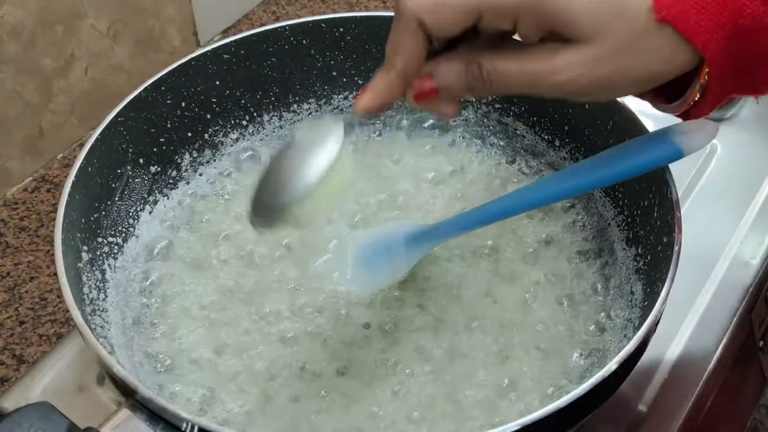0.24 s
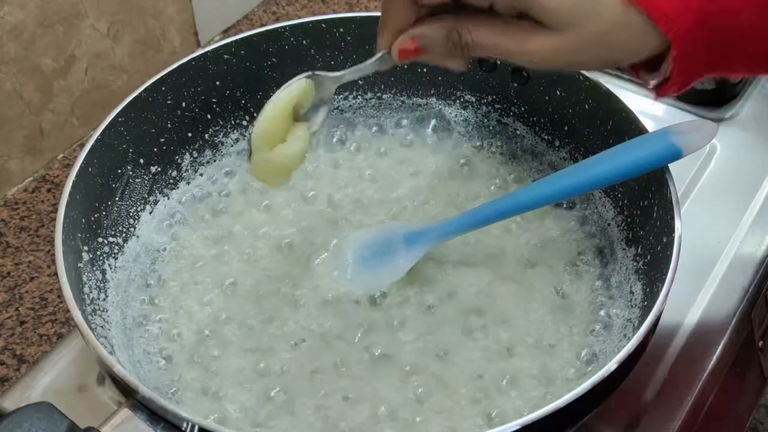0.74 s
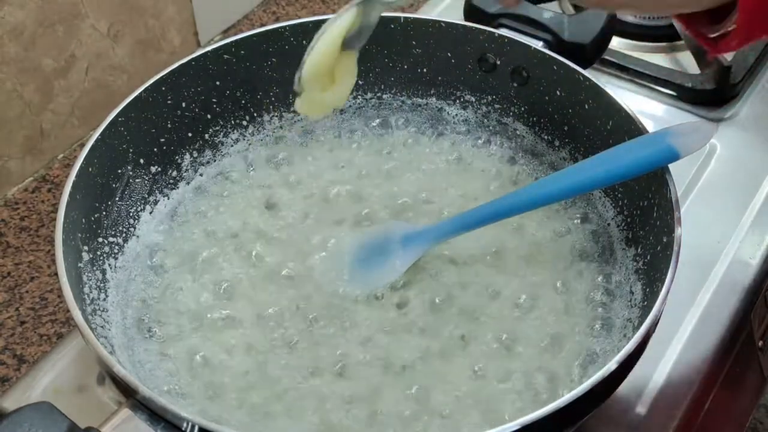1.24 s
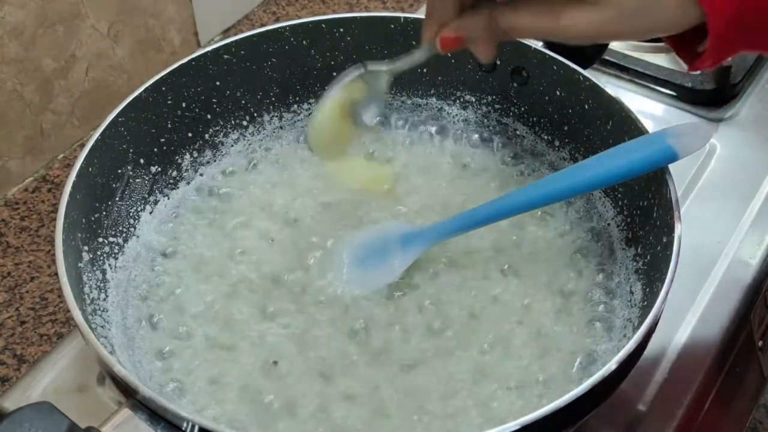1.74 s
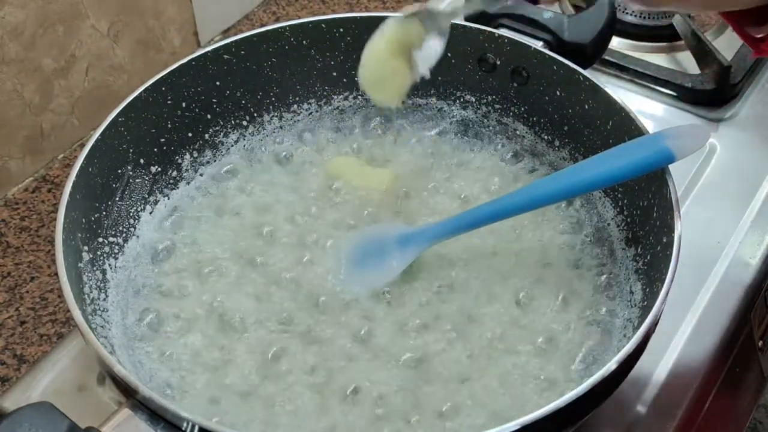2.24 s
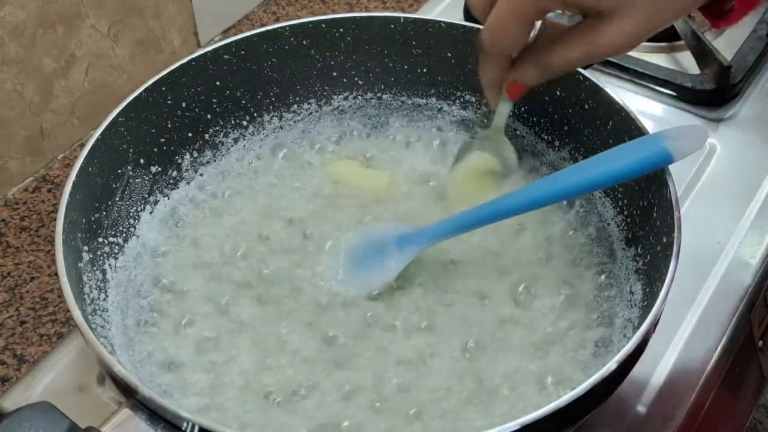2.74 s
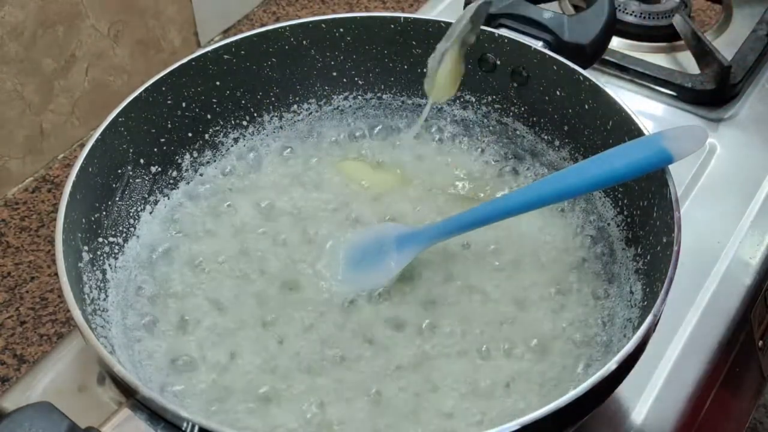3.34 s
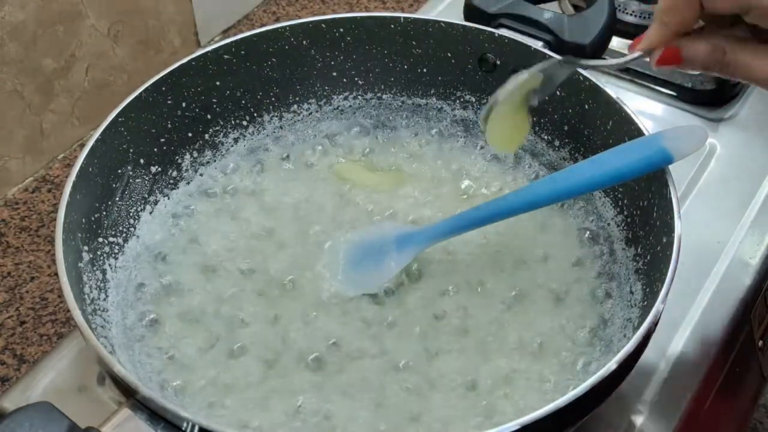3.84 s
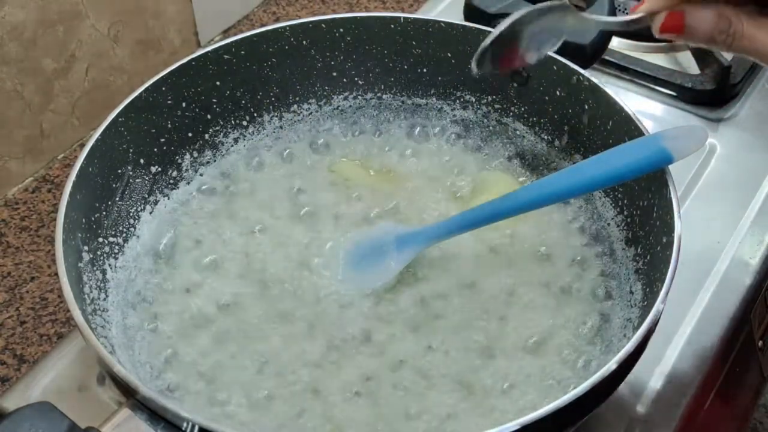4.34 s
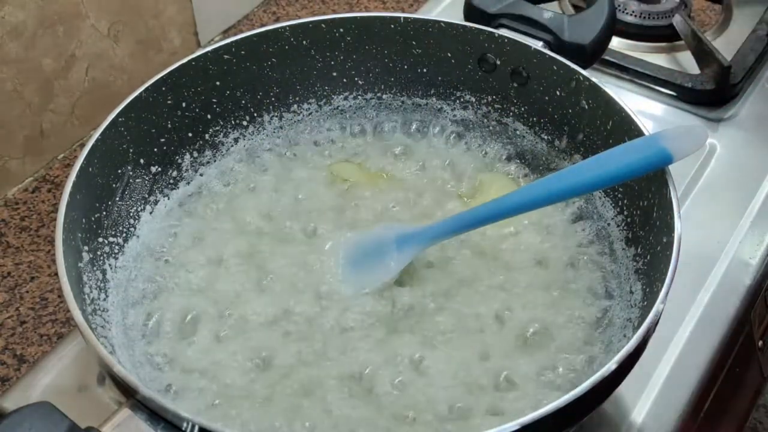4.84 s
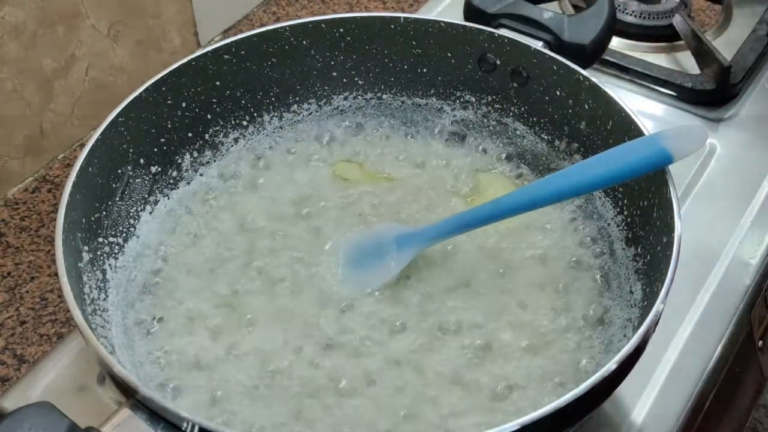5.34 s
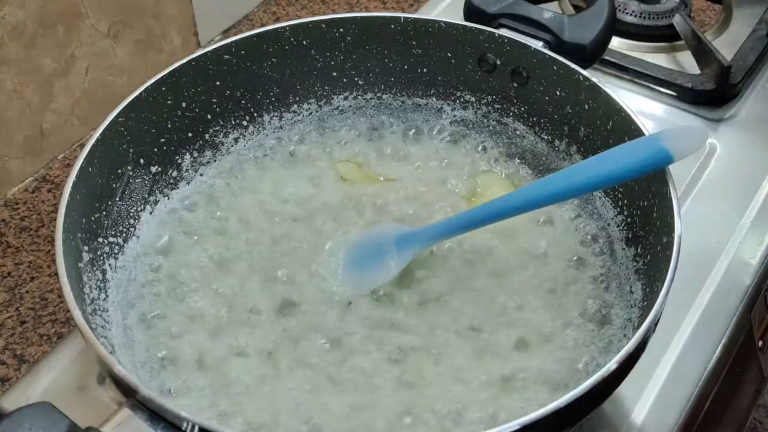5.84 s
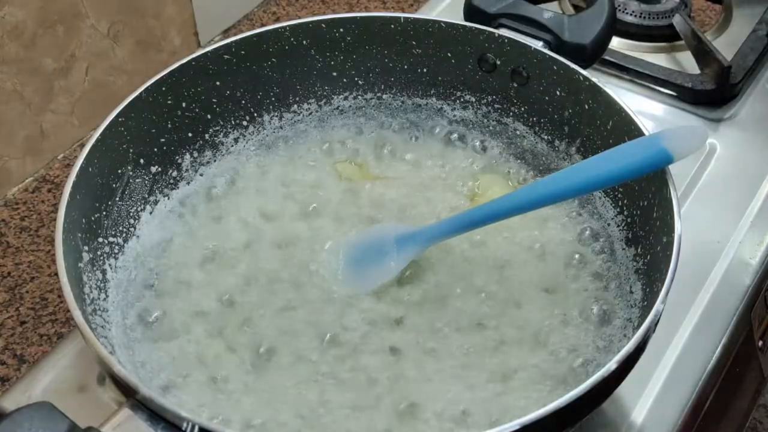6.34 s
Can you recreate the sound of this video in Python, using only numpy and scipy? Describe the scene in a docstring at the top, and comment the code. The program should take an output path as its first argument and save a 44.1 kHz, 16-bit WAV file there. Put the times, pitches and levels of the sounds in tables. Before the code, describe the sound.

Thick syrup bubbles in a wide pan with quick bright pops over soft burner hiss, a spoon knocks, an engine hums outside, dishes clatter late.

```python
"""In a hard kitchen, thick sugar syrup simmers in a wide pan: small skins burst as short ringing ticks.
The burner hisses as patchy coloured noise, and a spoon knocks and rubs the pan, ringing its modes.
Off to the left, steel dishes are dragged as slipping noise and set down as blows on crowds of partials.
Outside an engine gains speed, drops back and idles; its orders swell as they cross the room's bass modes."""
import sys
import numpy as np
from scipy import signal
from scipy.fft import next_fast_len
from scipy.io import wavfile
from scipy.ndimage import uniform_filter1d

SR = 44100
rng = np.random.default_rng(int(sys.argv[2]) if len(sys.argv) > 2 else 0)


def wav_record(signal):
    """Record a signal, one row per channel, as 16-bit PCM in the file named by sys.argv[1]."""
    frames = np.transpose(np.atleast_2d(signal))
    bounded = np.clip(frames, -1, 1)
    # unit amplitude maps onto the largest positive 16-bit level
    quanta = np.round(bounded * 32767).astype(np.int16)
    wavfile.write(sys.argv[1], SR, quanta)


N = 290612  # length in samples


def gain_of(db):
    """Turns decibels into amplitude."""
    return 10 ** (np.asarray(db) / 20)


def evened(x):
    """Scales a signal to rms 1."""
    return x / np.sqrt(np.mean(x ** 2) + 1e-20)


def read(points, hz):
    """Reads a curve over frequency, straight between its points on a log-frequency axis."""
    f, value = np.transpose(points)
    return np.interp(np.log(hz + 1), np.log(f + 1), value)


def add(mix, s, sound):
    """Adds a sound into the mix at time s in seconds, cut where the mix ends."""
    part = mix[..., max(round(s * SR), 0):][..., :sound.shape[-1]]
    part += sound[..., :part.shape[-1]]


def follow(rows):
    """Returns the start time and every further column drawn out sample by sample."""
    s, *columns = np.transpose(rows)
    t = np.arange(s[0], s[-1], 1 / SR)
    return s[0], [np.interp(t, s, c) for c in columns]


# How alike left and right are. Each row: frequency in Hz, likeness from 0 to 1.
EAR_LIKENESS = [(100, 0.76), (250, 0.86), (600, 0.61), (1500, 0.066), (10000, 0.018)]


def blend_ears(left, other, hz):
    """Mixes a second spectrum with the left one so the ears agree in the bass and part in the treble."""
    same = np.clip(read(EAR_LIKENESS, hz), -1, 1)[:, None]
    return np.array([left, same * left + np.sqrt(1 - same ** 2) * other])


def noise(spectrum, patchy_db, size=512):
    """Two partly alike channels of coloured noise whose level drifts in patches of time and frequency; rms 1."""
    frames = N * 4 // size + 5
    hz = np.fft.rfftfreq(size, 1 / SR)
    a, b, c, d, patches = rng.standard_normal((frames, len(hz), 5)).T
    patches = uniform_filter1d(patches, size=6, axis=0)
    patches = evened(uniform_filter1d(patches, size=20, axis=1))
    grains = blend_ears(a + 1j * b, c + 1j * d, hz)
    grains = grains * gain_of(read(spectrum, hz)[:, None] + patchy_db * patches)
    return evened(signal.istft(grains, nperseg=size, noverlap=size * 3 // 4)[1][:, :N])


def struck(modes, crowd):
    """One blow on thin metal: each mode is nine close partials, shares set by where it lands; peak 1."""
    t = np.arange(SR // 5) / SR
    hz, db, t60 = np.repeat(np.transpose(modes), 9, axis=1)[:, :, None]
    share, detune, phase = rng.standard_normal((3, len(hz), 1))
    level = gain_of(db + 3 * share - 60 * t / t60)  # shares spread by 3 dB
    partials = level * np.sin(2 * np.pi * hz * (1 + crowd * detune) * t + phase)
    ring = partials.sum(0) * np.minimum(t / 0.00067, 1)  # contact takes a moment
    return ring / abs(ring).max()


def crack(t60, low_hz, high_hz):
    """A short burst of decaying noise, held to one band."""
    t = np.arange(SR // 10) / SR
    burst = rng.standard_normal(len(t)) * gain_of(-60 * t / t60)
    edges = np.clip([low_hz, high_hz], 50, 20000)
    return signal.sosfilt(signal.butter(2, edges, "band", fs=SR, output="sos"), burst)


# The room's decay. Each row: frequency in Hz, time to fall 60 dB in seconds.
KITCHEN_DECAY = [(250, 0.58), (1000, 0.43), (3000, 0.47), (8000, 0.33), (15000, 0.33)]


def kitchen(x):
    """The room: sparse taps of random sign, each band dying at its own speed, other taps for each side."""
    taps = np.zeros((2, SR))
    at = np.arange(200, SR - 20, 20) + rng.integers(0, 20, (2, (SR - 201) // 20))
    np.put_along_axis(taps, at, rng.choice([-1., 1.], at.shape), 1)
    hz, t, z = signal.stft(taps, SR, nperseg=256)
    z = blend_ears(z[0], z[1], hz)  # long bass waves reach both sides alike
    decay = gain_of(-60 * t / read(KITCHEN_DECAY, hz)[:, None])
    tail = signal.istft(z * decay, SR, nperseg=256)[1]
    return signal.fftconvolve(x[None], tail / np.linalg.norm(tail[0]), axes=1)[:, :N]


# Room resonances in the bass. Each row: frequency in Hz, width in Hz, relative strength in dB.
BASS_MODES = [(74.7, 2.2, -17), (87.3, 10, -1.5), (111.46, 4.3, 10), (125.4, 13.3, 7), (146, 7.9, 0.5)]
# Engine speed, one list a gear. Each row: time in seconds, firing rate in Hz.
GEARS = [
    [(0, 18.6), (1.15, 22), (1.75, 22.7), (1.9, 24), (2.82, 27.3)],
    [(2.8, 18), (3.3, 18.6), (5.7, 18.5), (6.0, 17.8), (6.59, 17.7)],
]
# Engine loudness. Each row: time in seconds, level in dB.
ENGINE_LEVEL = [(0.0, -59.5), (0.45, -64.5), (0.81, -53), (1.3, -62), (1.47, -51.5), (1.82, -59),
                (2.0, -51), (2.18, -53.5), (2.42, -49), (2.7, -64), (2.88, -53), (3.16, -61), (3.76, -54.5),
                (4.6, -58), (5.8, -49.5), (6.13, -56.5), (6.29, -49.5), (6.59, -66)]


def engine():
    """Orders of the firing rate, each as loud as the room's bass modes let it be; one level curve sets the sum."""
    out = np.zeros(N)
    order = np.arange(3, 14)[:, None]
    for rows in GEARS:
        s, (firing_hz,) = follow(rows)
        count = len(firing_hz)
        pull = sum(gain_of(db) / (1 + (2 * (order * firing_hz - f) / width) ** 2)
                   for f, width, db in BASS_MODES)
        waver = uniform_filter1d(rng.standard_normal((len(order), count // 64 + 1)), size=120, axis=1)
        waver = np.repeat(evened(waver), 64, axis=1)[:, :count]
        pull = pull * gain_of(5 * waver)  # uneven firing
        start_phase = 2 * rng.standard_normal((len(order), 1))
        tones = pull * np.sin(2 * np.pi * order * np.cumsum(firing_hz) / SR + start_phase)
        sound = tones.sum(0) / np.sqrt((pull ** 2).sum(0) / 2)  # swells shift the balance, not the total
        add(out, s, sound * signal.windows.tukey(count, .02))
    level = gain_of(np.resize(follow(ENGINE_LEVEL)[1][0], N))
    return out * level * gain_of([[-.7], [.7]])  # a touch to the right


# Loudness of the murmur from the street. Each row: time in seconds, level in dB.
MURMUR_LEVEL = [(0.0, -61.5), (0.48, -66), (2.29, -57.5), (3.14, -59), (3.38, -63), (4.94, -64),
                (5.45, -62.5), (5.87, -61), (6.22, -54.5), (6.41, -74), (6.59, -56.5)]
# Colour of the murmur. Each row: frequency in Hz, relative level in dB per Hz.
MURMUR_COLOUR = [(100, 1), (199, -3.5), (310, -3), (400, -2.5), (599, -14.5), (734, -10.5), (1160, -22),
                 (2500, -20.5), (3250, -28.5), (5500, -120)]


def murmur(throb):
    """The engine's murmur through the walls: low noise throbbing with the engine's firing."""
    level = gain_of(np.resize(follow(MURMUR_LEVEL)[1][0], N))
    return level * (1 + 0.63 * throb) * noise(MURMUR_COLOUR, patchy_db=2.74, size=2048)


# Colour of the burner's hiss. Each row: frequency in Hz, relative level in dB per Hz.
HISS_COLOUR = [(880, -18), (1500, 6.5), (2670, -28), (2860, -6), (3830, -9), (14600, -17.5), (15500, -48)]
HISS_DB = -78.5


def burner():
    """The burner's steady hiss: coloured noise in drifting patches."""
    return gain_of(HISS_DB) * noise(HISS_COLOUR, patchy_db=2)


def pop(hz, cycles, glide):
    """A skin snaps and the open cavity rings a few cycles, rising as it shrinks; peak 1."""
    turns = np.arange(220) / SR * hz
    sound = np.sin(2 * np.pi * turns * (1 + glide * turns)) * turns ** 2 * np.exp(-turns / cycles)
    return sound / abs(sound).max()


# The clearest bursting bubbles, and at 5.4761 s the sharp click of a dish set down. Each row: start in seconds,
# level in dB of the tick before scattering, pitch in Hz.
CLEAR_POPS = [(0.0573, -46, 4840), (0.1444, -51, 3040), (0.2293, -51, 4530), (0.4164, -52, 3630),
              (0.2015, -43.5, 4700), (0.278, -47.5, 3900), (0.434, -42, 3700), (0.505, -49, 3630),
              (0.5515, -46, 3800), (0.604, -47, 5200), (0.7295, -50, 2840), (0.7437, -45.5, 3520),
              (0.8034, -44, 3470), (0.924, -49, 4800), (0.9502, -59, 2870), (1.1417, -52, 4100),
              (0.9604, -54, 4620), (0.9693, -43.5, 3150), (0.9978, -35.5, 3560), (1.0208, -48, 3700),
              (1.167, -42.5, 3180), (1.3758, -52.5, 5530), (1.2419, -51.5, 3720), (1.314, -54, 3160),
              (1.4073, -46.5, 4700), (1.4309, -44.5, 4100), (1.5462, -40, 4820), (1.6687, -43, 5500),
              (1.9016, -45.5, 4030), (1.946, -45, 4900), (2.1239, -51, 2860), (2.1513, -43.5, 4900),
              (2.2206, -45, 3460), (2.318, -47.5, 3820), (2.3967, -42.5, 4430), (2.453, -38.5, 3650),
              (2.6653, -47, 4040), (2.6244, -48.5, 3350), (2.6888, -37, 2850), (2.724, -41.5, 3670),
              (2.7952, -44.5, 3580), (2.8245, -40, 4700), (2.8446, -40.5, 2780), (2.972, -37.5, 7750),
              (2.997, -36.5, 3100), (3.1074, -46.5, 2950), (3.1438, -48, 3020), (3.1738, -45, 3560),
              (3.2243, -43.5, 3540), (3.2932, -51.5, 2700), (3.3258, -44.5, 3650), (3.481, -47.5, 3320),
              (3.4326, -50.5, 4730), (3.523, -45.5, 2940), (3.5471, -40, 5050), (3.695, -46.5, 2840),
              (3.589, -44, 3690), (3.68, -46, 4300), (3.8653, -49, 3500), (3.896, -47, 4330),
              (3.9566, -41, 4900), (4.03, -50, 4200), (4.1704, -43.5, 3800), (4.252, -49, 3820),
              (4.319, -48, 3780), (4.345, -48, 3800), (4.364, -48.5, 3000), (4.5482, -46, 2870),
              (4.6626, -51.5, 2850), (4.7664, -48.5, 3870), (4.808, -48.5, 3220), (4.8568, -48, 2770),
              (4.868, -44.5, 3970), (4.9227, -48, 3120), (4.94, -40, 4850), (4.995, -52, 2680),
              (5.1133, -44.5, 3280), (5.238, -45, 3040), (5.2636, -45, 3480), (5.278, -34.5, 5050),
              (5.309, -46.5, 3970), (5.4761, -28, 4570), (5.684, -42.5, 5300), (5.6925, -42, 4100),
              (5.786, -45.5, 3900), (6.106, -43.5, 4700), (6.158, -36, 3260), (6.4556, -48, 4950),
              (6.5322, -56, 2130)]


def syrup(small_db=-66, spread_db=4.5, count=900):
    """Clear pops, smaller neighbours and many faint ones, plus one dish's click; the curved pan scatters each
    for a few milliseconds."""
    when, size, pitch = rng.random((count, 3)).T
    faint_db = small_db - spread_db * np.log(size + 0.18)  # only a few stand out
    faint = np.transpose([when * N / SR, faint_db, 6000 / 2.3 ** pitch])
    # each clear pop sets off a weaker neighbour
    wait, weak, shift = rng.random((len(CLEAR_POPS), 3)).T
    neighbours = CLEAR_POPS + np.transpose([.002 + .02 * wait ** 2, -4 - 12 * weak, 2500 * (shift - .3)])
    out = np.zeros((2, N))
    lag = np.arange(440) / SR
    for s, db, hz in np.vstack([CLEAR_POPS, neighbours, faint]):
        short, side, sharp, edge = rng.random(4)
        snap = gain_of(-19 + 10 * edge) * pop(5500 + 2500 * sharp, 0.79, 0)  # the tearing skin
        tick = gain_of(db) * (pop(hz, .4 + .6 * short ** 2, 0.0081) + snap)
        bounces = rng.random(len(lag)) < .08
        scatter = rng.standard_normal((2, len(lag))) * bounces * gain_of(-9.0 - 60 * lag / 0.039)
        scatter[:, 0] = gain_of(np.array([4, -4]) * (side - .5))  # direct sound
        for ear, sign in enumerate((1, -1)):
            ear_delay = sign * .00008 * (side - .5)
            add(out[ear], s + ear_delay, np.convolve(tick, scatter[ear]))
    return out + gain_of(-5.5) * kitchen(out.mean(0))


# Spoon touches. Each row: start in seconds, base level in dB, scrape length in seconds,
# level of the gritty edge in dB against the base.
SPOON_TOUCHES = [(0.742, -50.5, 0.028, -4), (1.665, -47.5, 0.014, 4), (2.842, -29, 0.024, -10),
                 (2.875, -54, 0.059, 16), (2.959, -57, 0.08, 18.5), (2.996, -36.5, 0.011, 0.5),
                 (3.064, -39.5, 0.032, -0.5), (3.072, -41, 0.01, 0), (3.22, -41, 0.012, -9),
                 (3.229, -40, 0.017, -2.5), (4.245, -46, 0.019, 3), (4.923, -56.5, 0.0097, 12)]
# Ringing of the pan. Each row: frequency in Hz, relative level in dB, time to fall 60 dB in seconds.
PAN_MODES = [(337, -14.5, 0.157), (466, 7.5, 0.021), (730, 9.5, 0.022), (1463, -2, 0.073),
             (2397, -13.5, 0.085), (5850, -19, 0.091)]


def spoon():
    """Each touch is a rattle of contacts that rings the pan, with a dull rub and a gritty edge; long ones swell."""
    out = np.zeros(N)
    t = np.arange(SR // 10) / SR
    for s, db, length, edge_db in SPOON_TOUCHES:
        length = max(length, .002)
        press = np.exp(-(t / length) ** 3) * (1 - np.exp(-t / (.25 * length)))
        rattle = press * rng.standard_normal(len(t)) * (rng.random(len(t)) < .02)
        rattle[0] = 2  # the first knock
        ring = signal.fftconvolve(struck(PAN_MODES, crowd=.006), rattle)
        dull_rub = press * crack(0.19, 140, 1600)
        gritty_edge = press * crack(0.47, 1030, 5430)
        add(out, s, gain_of(db - 3.5) * ring / abs(ring).max())
        add(out, s, gain_of(db - 4) * dull_rub)
        add(out, s, gain_of(db + edge_db - 5.5) * gritty_edge)
    return out + gain_of(-2.5) * kitchen(out)


# Dishes dragged over the counter. Each row: start in seconds, swell in seconds, hold in seconds, rubbing level in dB.
DRAGS = [(5.351, 0.13, 0.025, -50.5), (5.585, 0.15, 0.57, -66), (6.131, 0.082, 0.064, -46.5)]
# Colour of the rubbing. Each row: frequency in Hz, relative level in dB per Hz.
RUB_COLOUR = [(88, -38), (150, -0.5), (948, 6.5), (3100, 2.5), (7500, -16), (15500, -36)]
DRAG_FADE_DB_PER_S = 313


def drag_strength():
    """How hard the dishes rub over time: each drag swells, holds and fades, roughened by short slips."""
    strength = np.zeros(N)
    t = np.arange(SR) / SR
    for s, swell, hold, db in DRAGS:
        fade_db = DRAG_FADE_DB_PER_S * np.maximum(t - swell - hold, 0)
        add(strength, s, np.sqrt(np.minimum(t / swell, 1)) * gain_of(db - fade_db))
    slips = np.repeat(rng.exponential(1, N // 90 + 1), 90)[:N]  # the rim catches in short slips
    return strength * evened(uniform_filter1d(gain_of(3.5 * slips), size=40))


# Dishes set down. Each row: start in seconds, level of the ring in dB before panning and room,
# then body, jingle and clack in dB against the ring.
SET_DOWNS = [(5.4346, -70, 8, 3, 9), (5.475, -35.5, 1, -32, -0.5), (5.557, -38, -10, -2, 6),
             (5.8498, -13, -5.5, -55, -11.5), (6.01, -26.5, -1, -23, -8.5), (6.2085, -26, 6.5, -41, -21),
             (6.233, -47.5, 16.5, -32, -25), (6.266, -43.5, -9, 7.5, 12)]
# Modes of body, ring, jingle and cup. Each row: frequency in Hz, relative level in dB, time to fall 60 dB in seconds.
BODY_MODES = [(250, -3.5, 0.2), (551, -1.5, 0.077), (1163, 8.5, 0.026), (1363, 18, 0.014),
              (1597, 11.5, 0.014), (1832, -3, 0.12)]
RING_MODES = [(2520, -3, 0.04), (2640, -2, 0.06), (2720, 2, 0.08), (2950, -4, 0.04)]
JINGLE_MODES = [(7700, 20, 0.031), (7470, -18, 0.012), (11600, -13, 0.064), (11550, -31, 0.074),
                (11800, -13.5, 0.06), (16500, -16, 0.041)]
CUP_MODES = [(2350, -2, .04), (3155, 0, .05), (4124, -4, .03)]
CUP_S, CUP_DB = 5.5568, -32  # one clink of a cup: start in seconds, level in dB before panning and room
LEFT_LEAD = 20  # samples by which the direct sound of the blows reaches the left microphone first


def dishes():
    """Rubbing, and blows on body, ring and jingle modes with a wide clack, far enough to be mostly room."""
    blows = np.zeros(N)
    for s, db, body_db, jingle_db, clack_db in SET_DOWNS:
        add(blows, s, gain_of(db) * struck(RING_MODES, crowd=.013))
        add(blows, s, gain_of(db + body_db) * struck(BODY_MODES, crowd=.025))
        add(blows, s, gain_of(db + jingle_db) * struck(JINGLE_MODES, crowd=0.05))
        add(blows, s, gain_of(db + jingle_db - 7) * crack(0.06, 5500, 20000))  # the jingle's clatter
        add(blows, s, gain_of(db + clack_db) * crack(0.07, 1800, 4800))
    add(blows, CUP_S, gain_of(CUP_DB) * struck(CUP_MODES, crowd=.02))
    rubbing = noise(RUB_COLOUR, patchy_db=1.5, size=256) * drag_strength()
    direct = np.array([blows, np.roll(blows, LEFT_LEAD)]) * gain_of([[.6], [-.6]])
    return direct + gain_of(2.0) * kitchen(blows + rubbing[0]) + rubbing


def scene():
    """Everything the two microphones hear; the engine's envelope also drives the murmur's throb."""
    hum = engine()
    beat = abs(signal.hilbert(hum[0], next_fast_len(N))[:N])
    throb = beat / (uniform_filter1d(beat, size=8000) + 1e-9) - 1
    return hum + murmur(throb) + burner() + syrup() + spoon() + dishes()


def record(dry):
    """A noise suppressor lowers each band as it sinks toward its quiet level; then a bass cut and a treble limit."""
    z = signal.stft(dry, nperseg=512, noverlap=384)[2]
    power = uniform_filter1d((abs(z) ** 2).mean(0), size=30, axis=0)
    power_db = 10 * np.log10(uniform_filter1d(power, size=12, axis=1) + 1e-16)
    quiet_db = np.percentile(power_db, 15, axis=1, keepdims=True)
    cut_db = .45 * np.clip(power_db - quiet_db - 9, -14, 0)
    cleaned = signal.istft(z * gain_of(cut_db), nperseg=512, noverlap=384)[1][:, :N]
    thin = signal.sosfilt(signal.butter(6, 70, "high", fs=SR, output="sos"), cleaned)
    treble_limit = signal.firwin(511, 15700, window=("kaiser", 9), fs=SR)
    return signal.oaconvolve(thin, treble_limit[None], "same")


dry = scene()
out = record(dry)
wav_record(out)
```